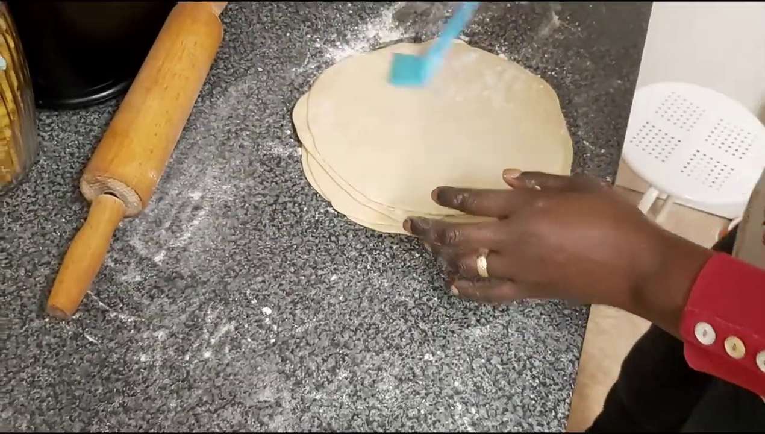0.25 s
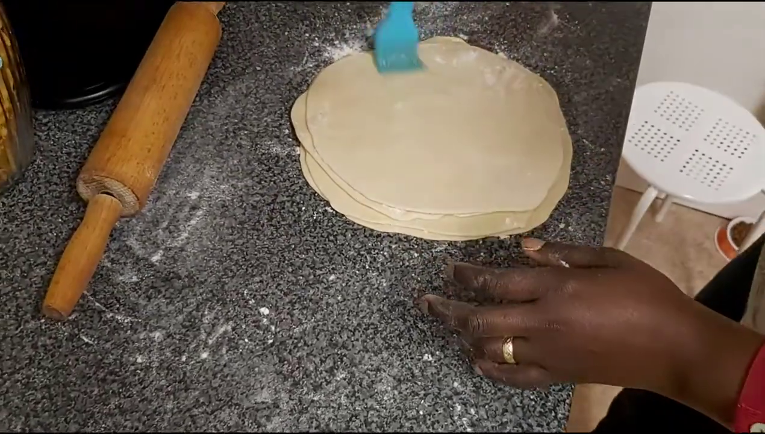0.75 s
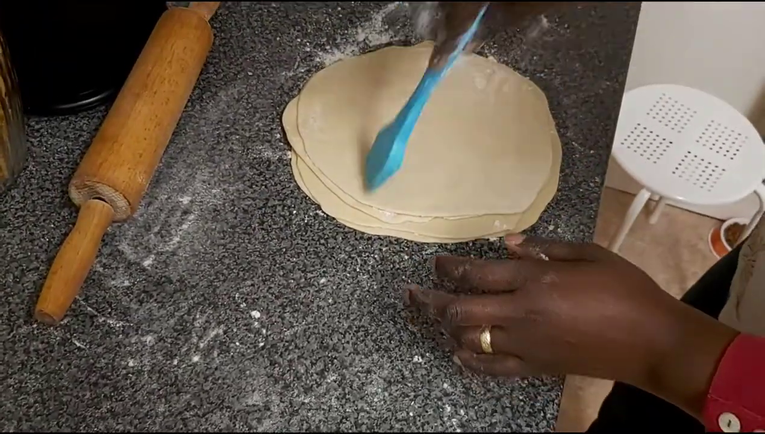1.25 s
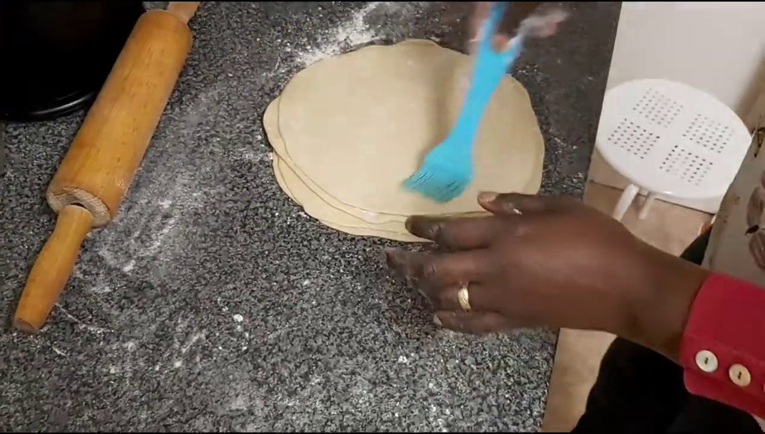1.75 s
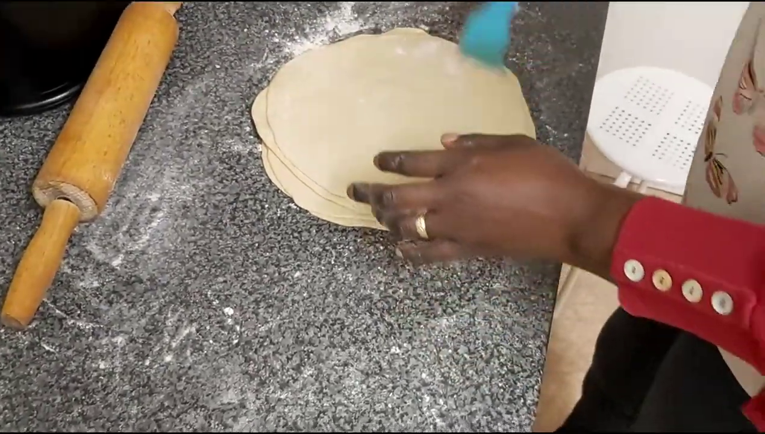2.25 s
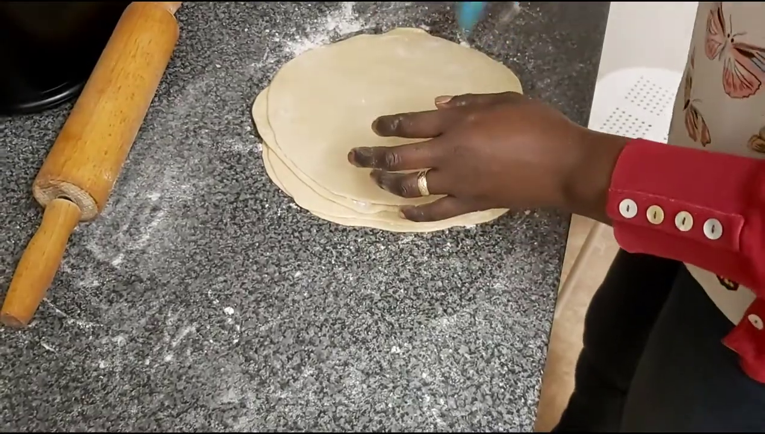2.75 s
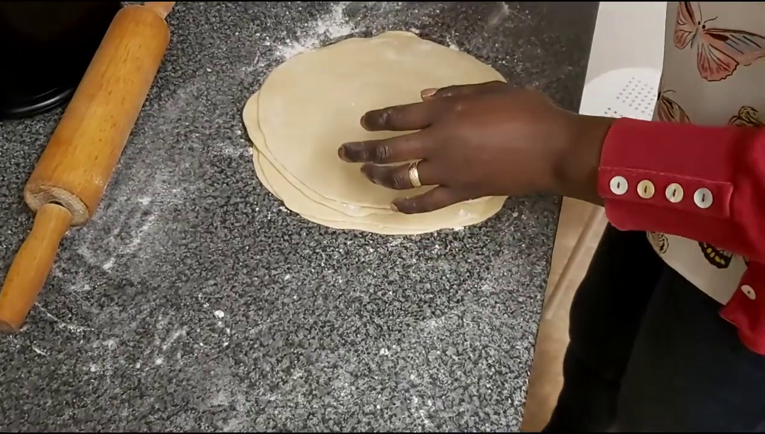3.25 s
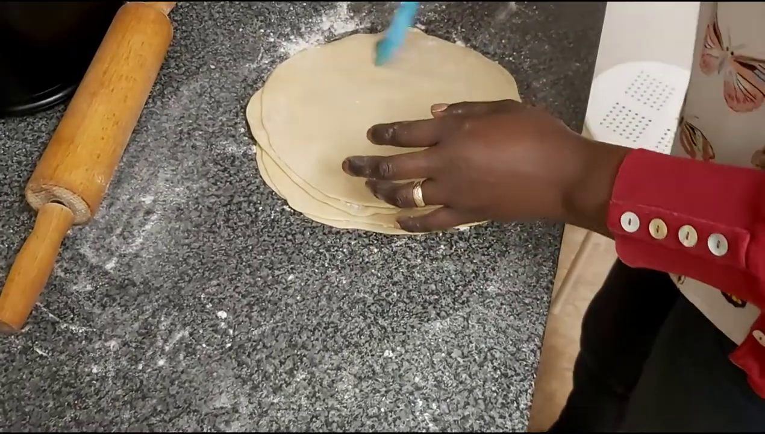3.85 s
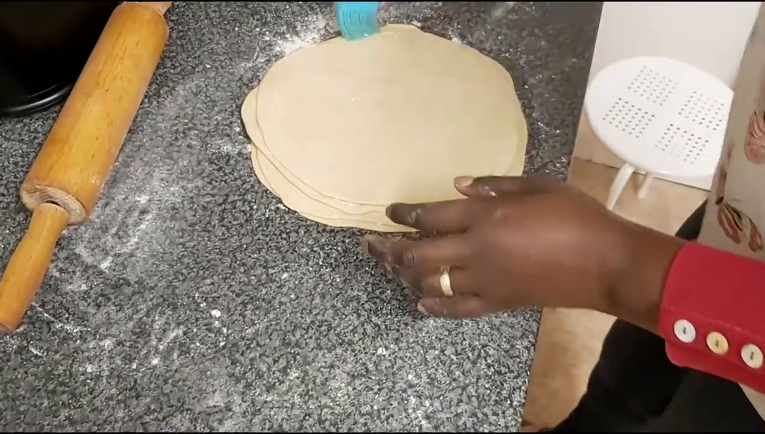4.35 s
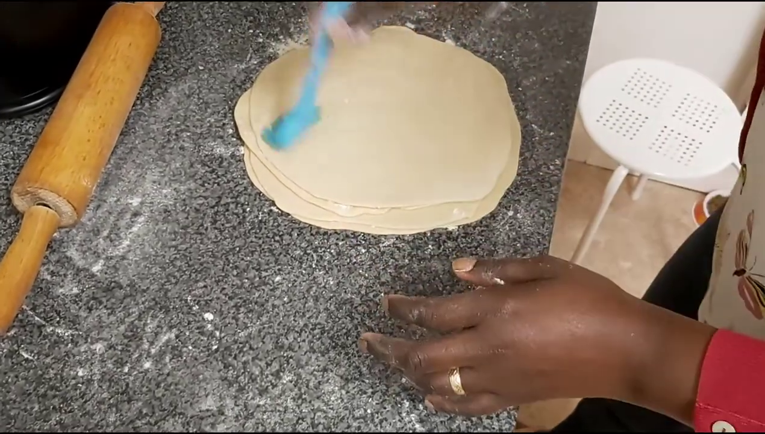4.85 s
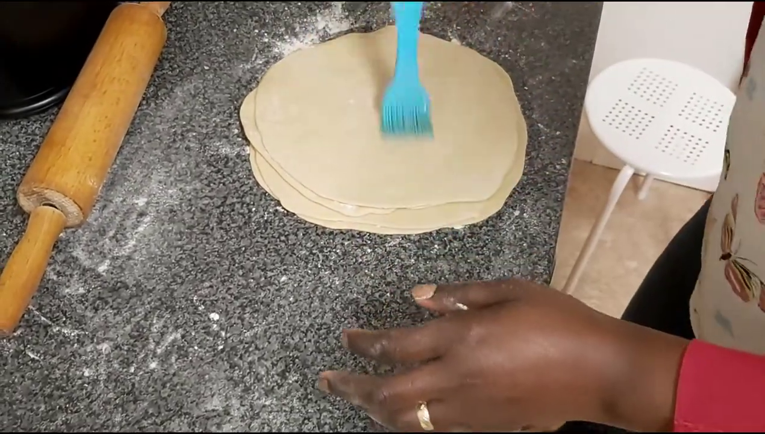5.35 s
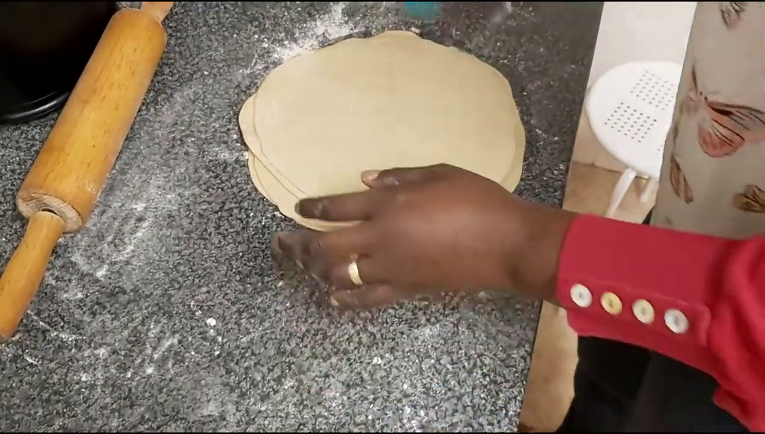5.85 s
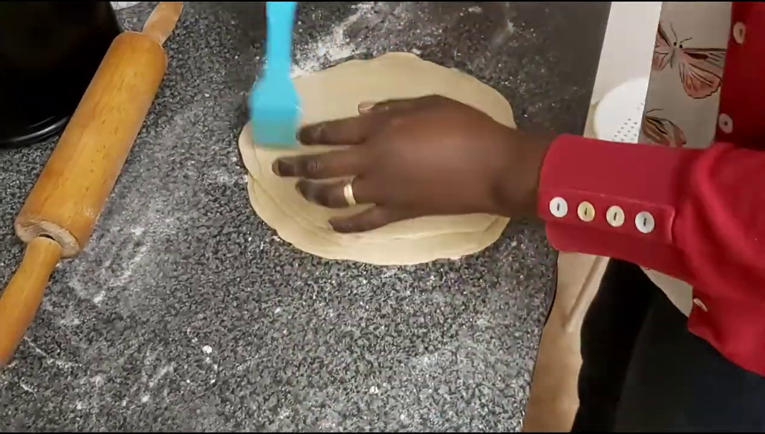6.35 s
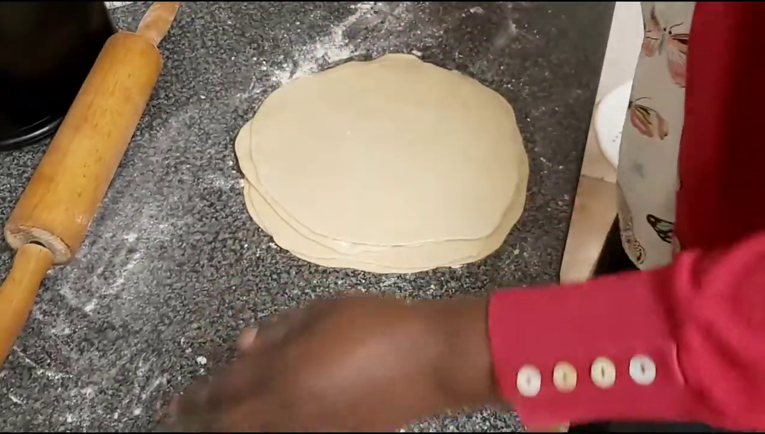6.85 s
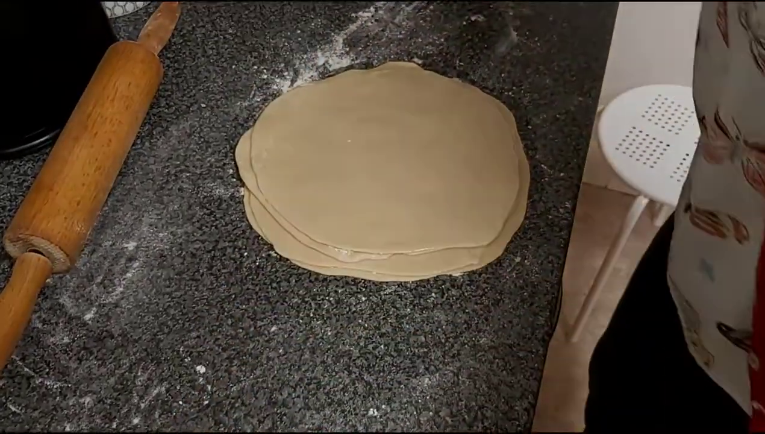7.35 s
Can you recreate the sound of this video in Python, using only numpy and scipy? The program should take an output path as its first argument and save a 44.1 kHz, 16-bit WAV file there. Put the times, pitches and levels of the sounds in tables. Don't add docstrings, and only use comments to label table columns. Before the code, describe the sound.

A low, slightly wavering appliance hum with mains buzz and soft air noise runs throughout a small, hard-surfaced kitchen, heard in close stereo. From 0 to 2.7 s a silicone brush strokes oiled dough: soft, quick, grainy hisses near 0.4, 0.8, 1.05, 1.5, 1.9, 2.25 and 2.65 s, with tiny bristle snaps and a faint wet squeak around 1.05. A light rim tap comes at 2.86, then faint hand slides. At 3.49 to 3.65 the brush raps a bowl in a fast dry clatter, sharpest at 3.58, with a low worktop thump and short squeal. Gentle strokes return from 4.0 to 5.9 s, some barely audible, then fade into light touches and sleeve rustle until 7.2. At 7.27 a board lands with a loud hollow clunk, rocks in small knocks, and a dish rings thin and high, choking off by 7.4. Hum and faint rustling remain until about 7.6.

```python
import sys
import numpy as np
from scipy import signal
from scipy.fft import rfft, irfft, next_fast_len
from scipy.io import wavfile
from scipy.ndimage import uniform_filter1d, map_coordinates

SR = 44100
rng = np.random.default_rng(int(sys.argv[2]) if len(sys.argv) > 2 else 0)


def materialize(psi):
    bounded = np.clip(np.atleast_2d(psi).T, -1, 1)
    quanta = np.round(bounded * 32767).astype(np.int16)
    wavfile.write(sys.argv[1], SR, quanta)


def natural_amplitude(level_db):
    exponent = np.asarray(level_db, float) / 20
    return 10 ** exponent


N = 335149
STFT_HOP, TONE_STEP = 128, 16

# (full pressure [s], rise [s per 20 dB], hold [s], bristle hiss [dB], drag on dough [dB])
FLAT_STROKES = [
    (.44, .065, .015, -44, -3),
    (.787, .085, .012, -50, 1),
    (2.235, .017, .01, -59, -4),
    (2.27, .05, .02, -53, -9),
    (5.125, .11, .005, -49.5, -6),
    (5.362, .02, .04, -65.5, -5),
    (5.78, .07, .02, -56, -3),
]
HALF_RAISED_SWEEPS = [
    (1.05, .035, .012, -49, -2),
    (1.105, .06, .03, -54.5, 1),
    (1.515, .06, .045, -53, -5),
    (1.91, .09, .06, -53.5, -1),
    (2.665, .06, .055, -53, 2),
    (4.1, .13, .02, -62.5, 3),
    (4.58, .035, .08, -51.5, -9),
    (4.99, .045, .05, -65.5, -1),
    (5.54, .03, .01, -65, 0),
]
TIP_STROKES = [(.005, .02, .003, -82, 1), (.637, .01, .045, -65, -6), (.705, .015, .045, -64, -5),
               (1.02, .008, .003, -58, 4), (1.236, .02, .003, -69, -4), (1.4, .04, .003, -73, -4),
               (2.325, .09, .01, -50, -2), (2.575, .03, .003, -72, 2), (4.04, .04, .03, -71, 12),
               (4.337, .025, .02, -63.5, 3), (4.8, .03, .03, -75, 1), (5.44, .06, .003, -54.5, -3),
               (5.835, .09, .005, -54.5, 0), (6.33, .12, .003, -67, -3), (6.58, .07, .01, -59, -2)]
HAND_SLIDES = [(.252, .2, .003, -77, 6), (.9, .1, .06, -76, 14), (2.42, .1, .1, -72, 10),
               (2.78, .05, .04, -67, 10), (2.93, .1, .08, -73, 2), (3.11, .18, .23, -68, -3),
               (6.12, .1, .12, -80, 14), (4.87, .1, .003, -72, -6), (5.88, .1, .08, -70, 7),
               (6.6, .2, .1, -77, 12), (7.0, .25, .1, -66, 4), (7.24, .15, .01, -69, 5),
               (7.285, .012, .04, -61, 1), (7.4, .2, .2, -63.5, 5)]
BOWL_WIPE = [
    (3.518, .03, .095, -51, 4),
]
RAP_JAR = [
    (3.6, .03, .02, -41, 7),
]

# (release [s per 20 dB], tip band [dB], squeak pitch [Hz], splay [0-1])
STROKE_KIND = (.11, -11, 4750, 1.0)
SWEEP_KIND = (.105, -7, 4750, .7)
TIP_KIND = (.095, -1, 4750, .25)
SLIDE_KIND = (.13, -8, 3900, .1)
WIPE_KIND = (.04, 0, 4400, .6)
JAR_KIND = (.11, -15, 3900, .01)
TIP_OPENS_DB, DRAG_GROWS_DB, LIFT_S = 4, 5, .03
SQUEAK_HZ_PER_DB = 25

# (time [s], peak [dB], colour [Hz])
BRISTLE_FLICKS = [(0.637, -43, 7080), (1.0161, -36, 3870), (1.0372, -42, 11500), (1.048, -37, 5830),
                  (1.0515, -40, 12000), (3.5835, -34, 6500), (0.4036, -41, 4920), (0.4435, -39, 4060),
                  (1.2351, -48, 3790), (2.2373, -44, 4100), (4.3316, -48, 3040), (4.5695, -46, 4660),
                  (5.3622, -50, 5120)]
# (start [s], length [s], from [Hz], to [Hz], level [dB])
BRISTLE_SQUEALS = [
    (1.017, .018, 3700, 4100, -53),
    (1.04, .022, 4000, 5400, -49),
    (1.062, .022, 5700, 5800, -51),
    (.75, .06, 5400, 4000, -58),
    (3.595, .07, 2500, 2450, -39),
    (3.595, .07, 5000, 4000, -46),
]

# (time [s], peak [dB], sharpness [Hz], worktop thump [dB])
BOWL_RAPS = [(3.486, -40, 1500, -8), (3.506, -37.5, 990, 11), (3.519, -36, 1800, -5),
             (3.522, -25.5, 1400, 0), (3.527, -32, 1000, 2), (3.533, -23.5, 1200, -5), (3.540, -36, 900, 8),
             (3.548, -28, 1500, 1), (3.556, -33, 1000, 4), (3.564, -36, 1200, 2), (3.572, -42, 1200, 2),
             (3.5814, -22, 6000, -3), (3.5835, -23, 7000, -2), (3.586, -23, 5000, -3),
             (3.590, -27, 3000, 0), (3.596, -26, 2000, -2), (3.612, -38, 1200, 8), (3.618, -36, 4000, 10),
             (3.638, -38, 4000, -5), (3.652, -38, 3500, -8)]
# (time [s], pitch [Hz], level [dB], t60 [s])
BOWL_JOLTS = [(3.486, 800, -34, .04), (3.519, 1510, -25, .05), (3.519, 800, -21, .04),
              (3.526, 750, -22, .07), (3.53, 300, -24, .08), (3.546, 1420, -29, .05),
              (3.548, 180, -20, .09), (3.55, 740, -29, .05), (3.6, 520, -27, .1), (3.561, 380, -25, .06),
              (3.582, 200, -15, .1), (3.588, 900, -19, .06), (3.588, 330, -21, .12), (3.61, 150, -17, .12),
              (3.608, 350, -24, .08), (3.632, 780, -28, .06)]
# (pitch [Hz], level [dB], t60 [s])
BOWL_MODES = [(490, -4, .06), (606, -7, 0.05), (733, -2, 0.063), (775, 0, .07), (860, -2, 0.055),
              (905, -2, .04), (1060, -13, 0.034), (1300, -9, 0.02), (1520, -7, 0.03), (2500, 1, .02)]
# (pitch [Hz], level [dB], t60 [s])
RIM_MODES = [(1160, -9, .03), (1380, -2, .03), (1545, 0.5, .055)]
# (pitch [Hz], level [dB], t60 [s])
WORKTOP_MODES = [(105, -5, 0.1), (150, -4, 0.15), (176.5, -2, 0.1), (210, -8, .1), (265, -5, 0.095),
                 (300, -1, .1), (383, -4, 0.13)]
# (frequency [Hz], density [dB per Hz])
BOWL_CLACK = [(100, -30), (400, -1), (1500, -6), (2400, 5), (3200, -1), (5000, -2), (6300, -17),
              (15000, -31)]
RIM_TOUCH_S, RIM_RAP_S = 2.862, 3.582
RIM_TOUCH_DB, RIM_RAP_DB = -30.5, -12.5

# (time [s], peak [dB])
BOARD_LANDING = [
    (7.2706, -13.5),
    (7.277, -23),
    (7.284, -18),
    (7.290, -28),
    (7.300, -32),
    (7.312, -27),
    (7.339, -33),
    (7.357, -32),
    (7.435, -46),
]
# (pitch [Hz], level [dB], t60 [s])
BOARD_MODES = [(225, -19, 0.14), (325, -20, 0.2), (545, -9, .08), (619, -3, 0.1), (728, -3, 0.08),
               (850, 0, 0.1), (950, -5, .08), (1018, -3, 0.07), (1150, -5, 0.06), (1340, -8, 0.03),
               (775, 0, .06), (1981, -24, .15), (2750, -12, .02)]
# (frequency [Hz], density [dB per Hz])
BOARD_CLACK = [(150, -20), (500, -7), (950, 1.5), (1500, -9), (2500, -14), (3500, -29), (5000, -45),
               (15000, -77)]
# (pitch [Hz], level [dB], t60 [s])
UNDER_BOARD_MODES = [(215, -2, .09), (345, 3, .25), (385, -2, .15)]
SETTLE_S, SETTLE_DB = 7.283, -24

# (time [s], level [dB])
DISH_ROCKING = [
    (7.273, -29),
    (7.306, -30),
    (7.319, -41),
    (7.342, -37),
    (7.381, -32),
    (7.395, -38),
    (7.402, -54),
    (7.44, -50),
    (7.58, -74),
]
DISH_ROCKING_HZ = 2988
# (time [s], pitch [Hz], level [dB], t60 [s])
DISH_JOLTS = [(7.273, 1217, -32, .45), (7.352, 1232, -24, .13), (7.283, 950, -17, .08),
              (7.281, 1330, -22, .04), (7.335, 900, -27, .15), (7.3, 380, -27, .1), (7.298, 1237, -26, .14),
              (7.273, 5292, -55, .45), (7.273, 3962, -52, .22), (7.273, 5728, -63, .3),
              (7.273, 9394, -70, .2), (7.273, 6050, -62, .12), (7.273, 5265, -61, .5),
              (7.273, 5350, -58, .3), (7.273, 2950, -52, .5), (7.273, 8080, -70, .2)]
# (pitch [Hz], level [dB], t60 [s])
DISH_MODES = [(8000, -13, .2), (8400, -12, .1), (10800, -8, .06), (11200, -5, .12), (13240, -11, .15),
              (14100, -5, .15), (14520, 0, .12), (14800, 0, .1), (15070, 5, .14)]
DISH_HIT_S, DISH_HIT_DB = 7.271, -50

# (pitch [Hz], left [dB], right [dB], left lead [rad])
DRONE_TONES = [(69.9, -51, -51, .2), (99.7, -35.3, -39, -.1), (143.5, -56, -54, -.1), (170.8, -49, -42, .6),
               (213.3, -50.5, -45, -.3), (237, -63, -51.5, -.9), (274.3, -65, -58, -.8),
               (313.7, -54, -46, 0), (330.4, -62, -56, 0), (377, -60, -55, -.4), (406, -50, -46, -.4),
               (434.7, -61, -50.5, -.1), (472, -66, -63, .5), (577.9, -61, -53, -1.1),
               (639, -62, -62, -2.3), (656, -68, -58, -1.1), (700, -68, -63, -2.2), (777, -67, -57, -.7),
               (847, -65, -66, .9), (852.8, -55, -53, .9)]
# (frequency [Hz], density [dB per Hz])
AIR_SPECTRUM = [(25, -74), (38, -73), (85, -69.5), (120, -61.5), (195, -76), (290, -67.5), (460, -69),
                (600, -74), (900, -76), (1500, -84.5), (2900, -100), (6700, -112), (11000, -106),
                (16000, -109)]
# (centre [Hz], width [Hz], lift [dB])
AIR_RESONANCES = [(50.4, 6.2, 16), (57.5, 5.1, 20), (118, 10, 4), (69.3, 6, 19), (289.4, 49, 8.5),
                  (414, 24, 5), (725, 35, 11.5), (853, 34, 3.5), (1246, 85, 3.5), (1904, 90, 8),
                  (2330, 110, 7), (3030, 480, -4.5), (4100, 640, 8)]
# (frequency [Hz], correlation [-1 to 1])
AIR_LIKENESS = [(60, 0.99), (130, 0.92), (290, 1), (640, 0.25), (1410, -0.38), (3100, -0.052), (6820, -0.3),
                (15000, 0.054)]
# (frequency [Hz], left minus right [dB])
PORT_TILT = [(60, -1.5), (110, 0), (200, -4), (280, -10), (380, -9.5), (700, -0.5), (1290, -7),
             (2380, -7.0), (4400, -2.5), (8120, 4), (15000, -4)]
# (frequency [Hz], t60 [s])
ROOM_DECAY = [(100, 0.48), (500, 0.37), (2000, 0.32), (5000, 0.24), (9000, 0.19), (15000, 0.14)]
BOWL_LAG, BOARD_LAG = 1, 9


def brush(slips_per_s, slip_share, squeak_db, squeak_width_hz, patchy_db):
    slips = (rng.random(N) < slips_per_s / SR) * rng.exponential(1, N) * np.sqrt(SR / slips_per_s / 2)
    slip_power = uniform_filter1d(slips, size=24) ** 2 * 8
    grain = np.sqrt(1 - slip_share + slip_share * slip_power)
    hz, s, frames = signal.stft(grain * rng.standard_normal((2, N)), SR, nperseg=2 * STFT_HOP)
    hiss_db, tip_db, drag_db, squeak_hz, low_down = contact(s)
    hz = hz[:, None]

    drag_share = np.clip((3900 - hz) / 1300, 0, 1)
    tip_share = np.clip((hz - 6000) / 2500, 0, 1)
    bass_loss_db = 12 * np.clip(1 - hz / 1500, 0, 1) ** 2
    shape_db = drag_share * (drag_db + 4 - bass_loss_db)
    shape_db = shape_db + tip_share * (tip_db - 2.5 - 0.99 * (hz - 11000) / 1000)
    shape_db = shape_db + squeak_db / (1 + (2 * (hz - squeak_hz) / squeak_width_hz) ** 2)
    shape_db = shape_db + 4.3 / (1 + ((hz - 11800) / 1500) ** 2)
    shape_db = shape_db - 4 * low_down / (1 + ((hz - 3250) / 300) ** 2)

    patches = uniform_filter1d(rng.standard_normal(shape_db.shape), size=5, axis=0)
    patches = uniform_filter1d(patches, size=5, axis=1) * 5
    level_db = hiss_db + shape_db + patchy_db * patches + 7.5
    tilt_db = 0.48 * at_hz(PORT_TILT, hz) * [[[1]], [[-1]]]
    return signal.istft(frames * natural_amplitude(level_db + tilt_db), SR, nperseg=2 * STFT_HOP)[1][:, :N]


def contact(s):
    kinds = [(FLAT_STROKES, STROKE_KIND), (HALF_RAISED_SWEEPS, SWEEP_KIND), (TIP_STROKES, TIP_KIND),
             (HAND_SLIDES, SLIDE_KIND), (BOWL_WIPE, WIPE_KIND), (RAP_JAR, JAR_KIND)]
    rows = np.array([row + kind for table, kind in kinds for row in table])
    full_s, rise_s, hold_s, peak_db, drag_db, release_s, tip_db, squeak_hz, splays = rows.T[:, :, None]
    late_s = s - full_s
    rising = np.maximum(-late_s, 0) / rise_s
    releasing = np.maximum(late_s - hold_s, 0) / release_s
    level_db = peak_db - 20 * (rising + releasing)
    power = natural_amplitude(2 * level_db) + 1e-30
    total = power.sum(axis=0)
    share = power / total

    splay = splays * np.clip(late_s / (hold_s + LIFT_S), -.5, 1)
    tip_db = tip_db + TIP_OPENS_DB * splay
    drag_db = drag_db + DRAG_GROWS_DB * (splay - .5)
    squeak_hz = squeak_hz + SQUEAK_HZ_PER_DB * np.clip(level_db + 55, -30, 10)
    low_down = np.clip(4 * splays - .4, 0, 1)
    blended = [np.sum(share * colour, axis=0) for colour in (tip_db, drag_db, squeak_hz, low_down)]
    return 10 * np.log10(total), *blended


def flicks(length_s):
    size = 300
    out, t = np.zeros((2, N)), np.arange(size) / SR
    noise = rng.standard_normal((len(BRISTLE_FLICKS), 2, size))
    for (s, peak_db, hz), burst in zip(BRISTLE_FLICKS, noise):
        click = (0.96 * np.sin(2 * np.pi * hz * t) + 0.81 * burst) * np.exp(-t / length_s)
        start = round(s * SR)
        out[:, start:start + size] += natural_amplitude(peak_db - 4.0) * click
    return out


def squeals(width_hz):
    size = SR // 8
    out, t = np.zeros((2, N)), np.arange(size) / SR
    lowpass = signal.butter(2, width_hz / 2, fs=SR, output="sos")
    noise = signal.sosfilt(lowpass, rng.standard_normal((len(BRISTLE_SQUEALS), 2, 2, size)))
    for (s, length_s, from_hz, to_hz, db), (a, b) in zip(BRISTLE_SQUEALS, noise):
        done = np.clip(t / length_s, 0, 1)
        phase = 2 * np.pi * np.cumsum(from_hz + (to_hz - from_hz) * done) / SR
        band = (a * np.sin(phase) + b * np.cos(phase)) / a.std()
        swell = np.sqrt(np.abs(np.sin(np.pi * done)))
        start = round(s * SR)
        out[:, start:start + size] += natural_amplitude(db) * swell * band
    return out


def bowl_raps():
    s, peak_db, sharp_hz, thump_db = np.transpose(BOWL_RAPS)
    bowl = strike(s, peak_db, BOWL_MODES, sharp_hz, spread_db=3.0)
    thump = strike(s + 0.00187, peak_db + thump_db, WORKTOP_MODES, sharp_hz, spread_db=2.5)
    ring = natural_amplitude(-1.5) * (bowl + thump) + jolted(BOWL_JOLTS, rise_s=.003)
    clack_db = peak_db + 3.0 + 11 * np.log2(sharp_hz / 5000)
    return ring, clack(s, clack_db, BOWL_CLACK, t60_s=0.02)


def rim_touches():
    return strike([RIM_TOUCH_S, RIM_RAP_S], [RIM_TOUCH_DB, RIM_RAP_DB], RIM_MODES, [9000, 9000],
                  spread_db=0.5, rise_s=0.0011)


def board():
    s, peak_db = np.transpose(BOARD_LANDING)
    ring = strike(s, peak_db, BOARD_MODES, 6000 + 0 * s, spread_db=2.2)
    return ring + clack(s, peak_db + 4, BOARD_CLACK, t60_s=0.065)


def board_settle():
    return strike([SETTLE_S], [SETTLE_DB], UNDER_BOARD_MODES, [6000], spread_db=.6, rise_s=.004)


def dish():
    t = np.arange(N) / SR
    when_s, swell_db = np.transpose(DISH_ROCKING)
    onset = np.clip((t - when_s[0]) / 0.0048, 0, 1)
    rocking = onset * natural_amplitude(np.interp(t, when_s, swell_db)) * np.sin(2 * np.pi * DISH_ROCKING_HZ * t)
    bright = strike([DISH_HIT_S], [DISH_HIT_DB], DISH_MODES, [30000], spread_db=2, rise_s=.002)
    return rocking + jolted(DISH_JOLTS, rise_s=.004) + bright


def strike(times_s, peaks_db, modes, sharp_hz, spread_db, rise_s=0.00028):
    out, t = np.zeros(N), np.arange(SR // 3) / SR
    hz, db, t60_s = np.array(modes).T[:, :, None]
    rings = natural_amplitude(db - 60 * t / t60_s) * np.sin(2 * np.pi * hz * t) * (1 - np.exp(-t / rise_s))
    luck = rng.standard_normal((len(times_s), 2, len(modes)))
    for s, peak_db, cut_hz, (size, sign) in zip(times_s, peaks_db, sharp_hz, luck):
        softness = np.hypot(1, (hz[:, 0] / cut_hz) ** 2)
        weights = natural_amplitude(peak_db + spread_db * size) * np.sign(sign) / softness
        start = round(s * SR)
        out[start:start + len(t)] += (weights @ rings)[:N - start]
    return out


def jolted(rows, rise_s):
    out, t = np.zeros(N + SR), np.arange(SR // 2) / SR
    for s, hz, db, t60_s in rows:
        envelope = np.clip(t / rise_s, 0, 1) * natural_amplitude(db - 60 * t / t60_s)
        start = round(s * SR)
        out[start:start + len(t)] += envelope * np.sin(2 * np.pi * hz * t)
    return out[:N]


def clack(times_s, peaks_db, colour, t60_s):
    out, t = np.zeros(N), np.arange(SR // 5) / SR
    bins_hz = np.arange(len(t) // 2 + 1) * 5
    noise = irfft(rfft(rng.standard_normal((len(times_s), len(t)))) * natural_amplitude(at_hz(colour, bins_hz)))
    for s, peak_db, burst in zip(times_s, peaks_db, noise):
        envelope = natural_amplitude(peak_db - 60 * t / t60_s) * (1 - np.exp(-t / 0.00034))
        start = round(s * SR)
        out[start:start + len(t)] += (envelope * burst / burst.std())[:N - start]
    return out


def ports(x, pan_db, lag):
    return np.array([np.roll(x, lag), x]) * natural_amplitude(np.array([[-pan_db], [pan_db]]))


def drone_tones(wobble_db, sway_rad):
    size = N // TONE_STEP + 1
    hz, left_db, right_db, lead_rad = np.array(DRONE_TONES).T[:, :, None]
    loose = np.sqrt(hz / 400)
    phase = 2 * np.pi * (hz * np.arange(size) * TONE_STEP / SR + rng.random(hz.shape))
    phase = phase + sway_rad * loose * drift(3.0, count=len(hz), size=size)
    swell = np.sqrt(2) * natural_amplitude(wobble_db * loose * drift(2.532, count=len(hz), size=size))
    left = np.sum(swell * natural_amplitude(left_db) * np.sin(phase + lead_rad), axis=0)
    right = np.sum(swell * natural_amplitude(right_db) * np.sin(phase), axis=0)
    return signal.resample_poly([left, right], TONE_STEP, 1, axis=1)[:, :N]


def drift(rate_hz, count, size):
    knots = rng.standard_normal((count, 60))
    steps = np.arange(size) * TONE_STEP / SR * rate_hz
    return np.array([map_coordinates(row, [steps], order=3) for row in knots])


def air_noise():
    size = next_fast_len(N)
    hz = np.arange(size // 2 + 1) * SR / size
    lifts_db = sum(lift_db / (1 + (2 * (hz - f) / w) ** 2) for f, w, lift_db in AIR_RESONANCES)
    level_db = at_hz(AIR_SPECTRUM, hz) + lifts_db
    mid, side = rfft(rng.standard_normal((2, size)))
    alike = np.clip(at_hz(AIR_LIKENESS, hz), -1, 1)
    pair = np.sqrt(1 + alike) * mid + np.sqrt(1 - alike) * side * [[1], [-1]]
    tilt_db = at_hz(PORT_TILT, hz) / 2 * [[1], [-1]]
    return irfft(pair * natural_amplitude(level_db + tilt_db) * np.sqrt(SR / 8), size)[:, :N]


def kitchen(x, gap_s):
    window = dict(nperseg=8 * STFT_HOP, noverlap=7 * STFT_HOP)
    hz, s, frames = signal.stft(rng.standard_normal((2, SR // 2)), SR, **window)
    decay = natural_amplitude(-60 * s / at_hz(ROOM_DECAY, hz)[:, None])
    tail = signal.istft(frames * decay, SR, **window)[1]
    tail[1] = 0.27 * tail[0] + 1.0 * tail[1]
    tail = tail * np.clip(np.arange(tail.shape[1]) / SR / gap_s - 1, 0, 1)
    return signal.oaconvolve(x[None], tail, axes=1)[:, :N] / np.sqrt(np.sum(tail ** 2) / 2)


def at_hz(points, hz):
    table = np.array(points, float)
    return np.interp(np.log(np.maximum(hz, 1)), np.log(table[:, 0]), table[:, 1])


def scene():
    strokes = brush(slips_per_s=1100, slip_share=0.18, squeak_db=4.5, squeak_width_hz=2300, patchy_db=1.5)
    bristles = strokes + flicks(length_s=.0008) + squeals(width_hz=500)

    raps, crack = bowl_raps()
    touch, thud, chime = rim_touches(), board(), dish()
    knocks = ports(raps + touch, pan_db=1.4, lag=BOWL_LAG) + ports(crack, pan_db=.6, lag=BOWL_LAG)
    knocks = knocks + ports(thud, pan_db=2.0, lag=BOARD_LAG) + chime * natural_amplitude([[-1.5], [1.5]])
    settle = ports(board_settle(), pan_db=2.2, lag=BOARD_LAG)

    to_room = natural_amplitude(-8) * touch + natural_amplitude(-11) * raps + natural_amplitude(-8.5) * crack + natural_amplitude(-7.5) * thud + natural_amplitude(-14) * chime
    room = kitchen(to_room, gap_s=0.0022) * natural_amplitude([[-1.1], [1.1]])
    drone = drone_tones(wobble_db=1.8, sway_rad=0.6) + air_noise()
    return bristles + knocks + settle + room + drone


def roll_off(x):
    return signal.sosfilt(signal.butter(12, 15800, fs=SR, output="sos"), x)


def record(dry):
    bass_cut = signal.butter(2, 35, "high", fs=SR, output="sos")
    top_cut = signal.ellip(12, .5, 70, 15760, fs=SR, output="sos")
    mix = signal.sosfilt(top_cut, signal.sosfilt(bass_cut, dry))
    return roll_off(mix)


dry = scene()
out = record(dry)
materialize(out)
```